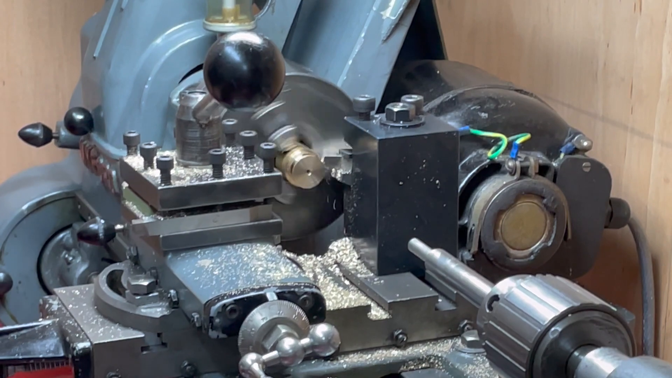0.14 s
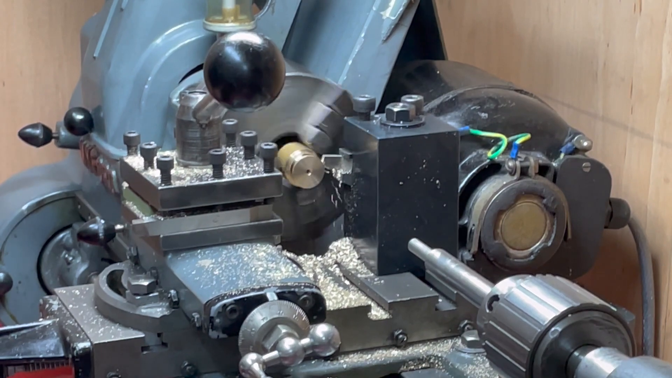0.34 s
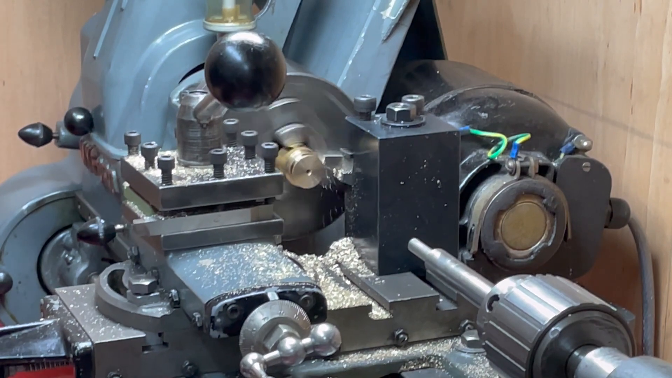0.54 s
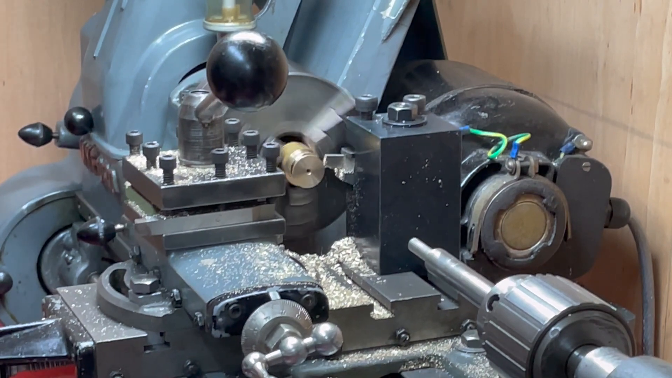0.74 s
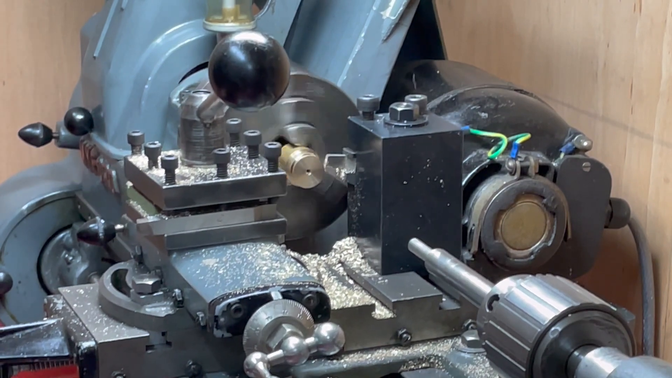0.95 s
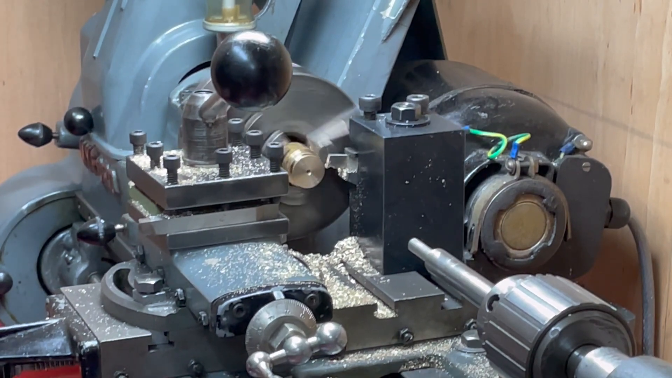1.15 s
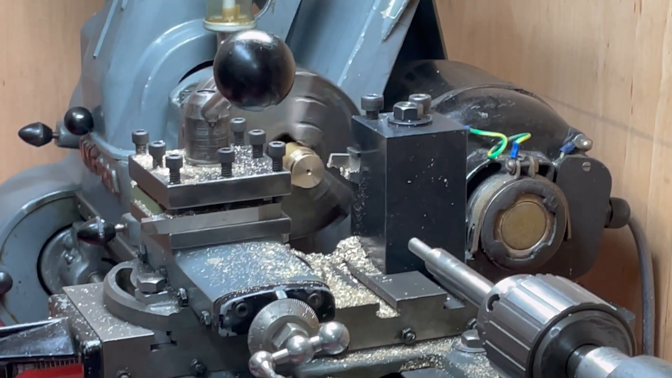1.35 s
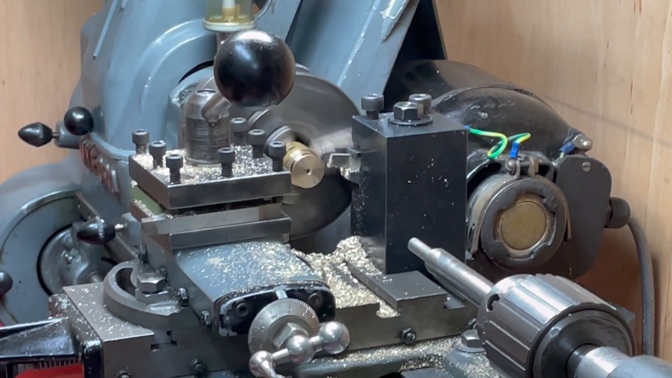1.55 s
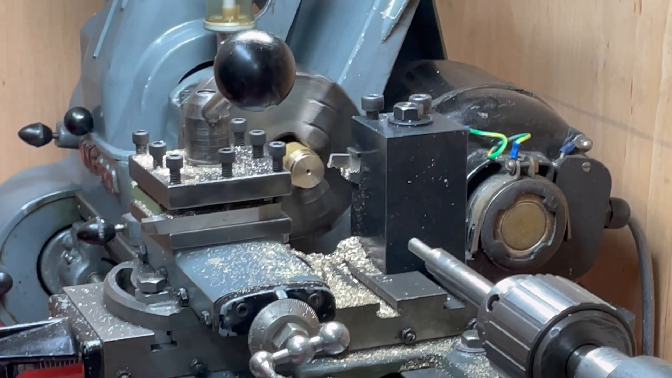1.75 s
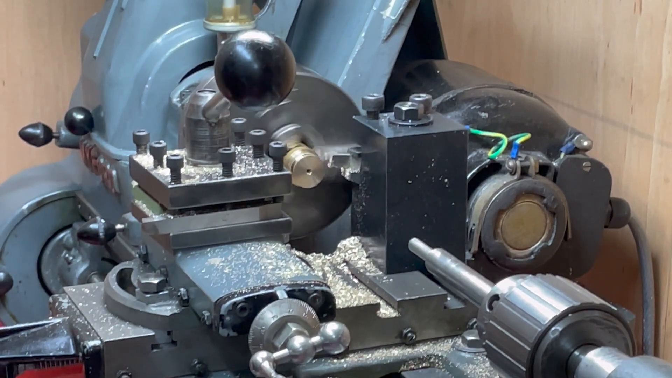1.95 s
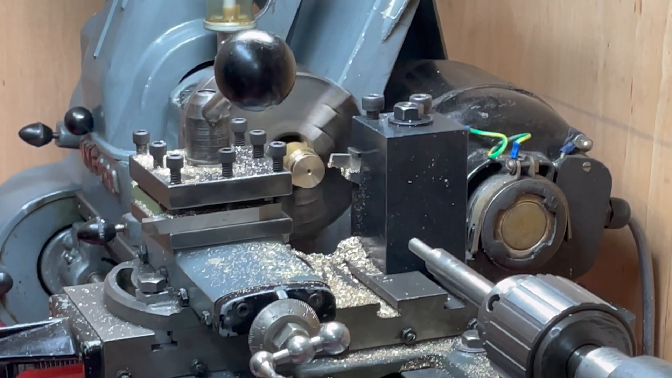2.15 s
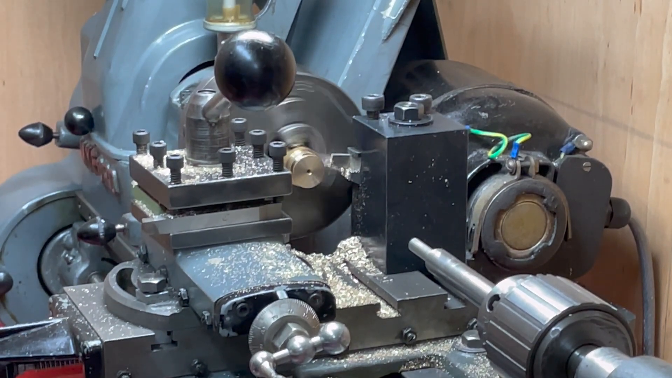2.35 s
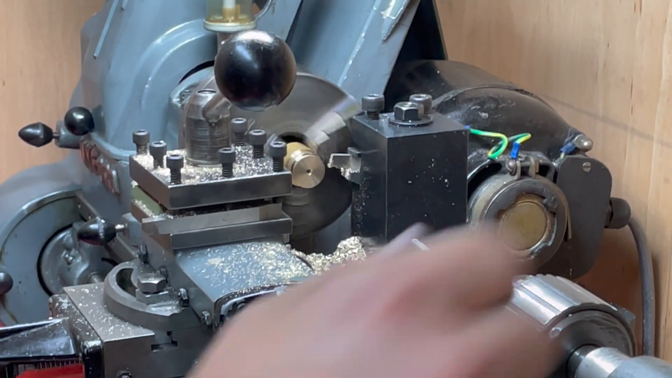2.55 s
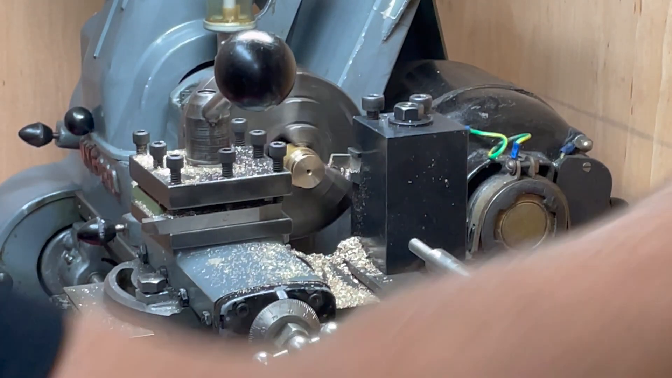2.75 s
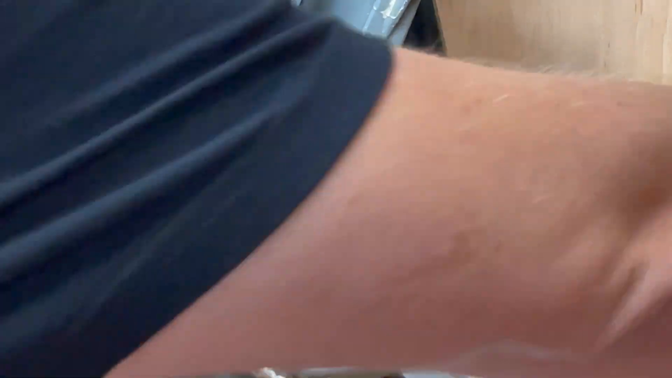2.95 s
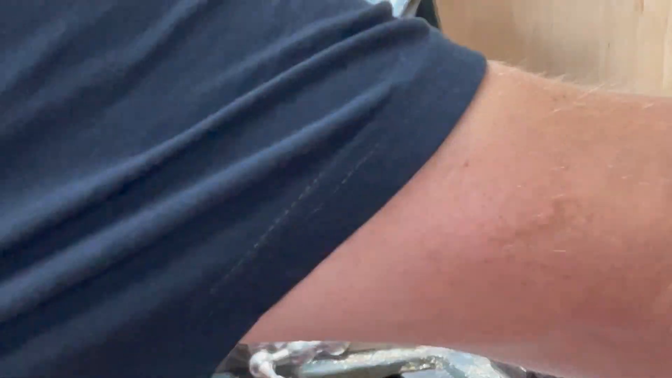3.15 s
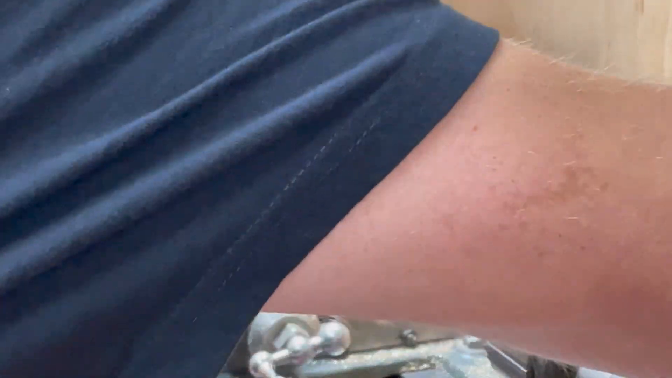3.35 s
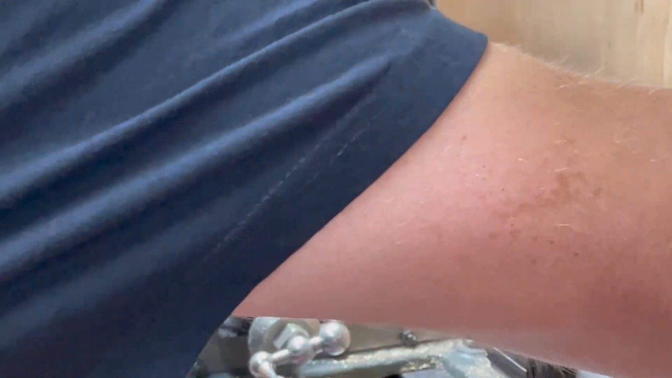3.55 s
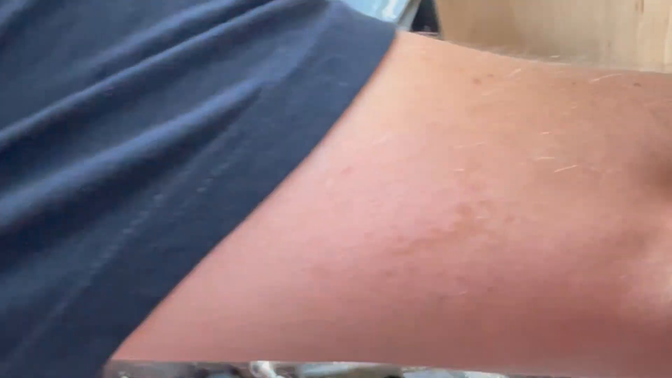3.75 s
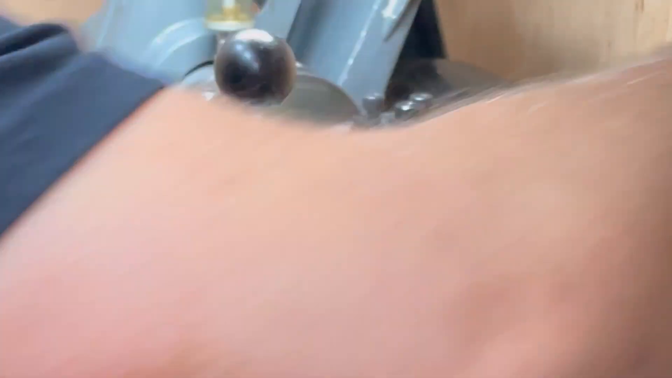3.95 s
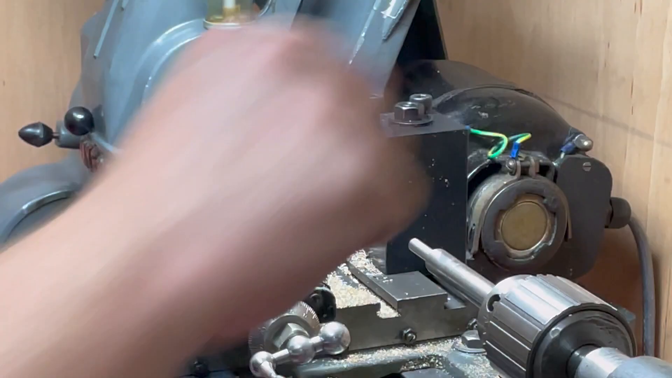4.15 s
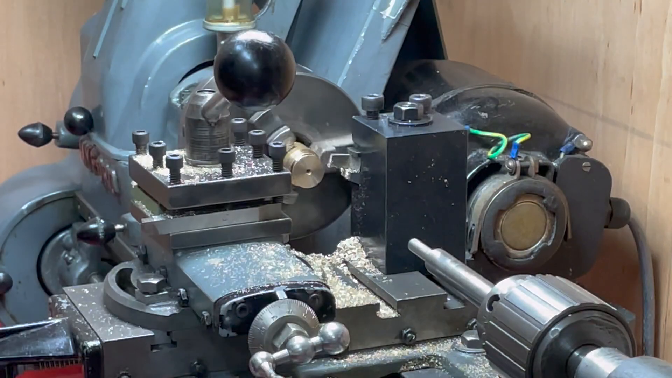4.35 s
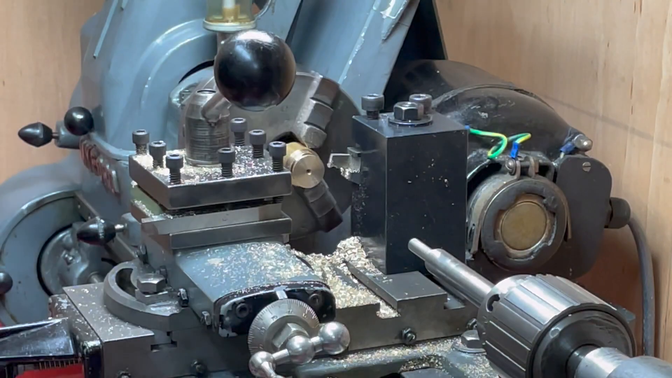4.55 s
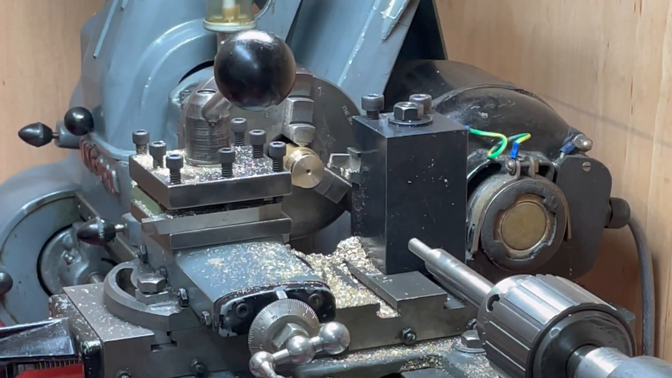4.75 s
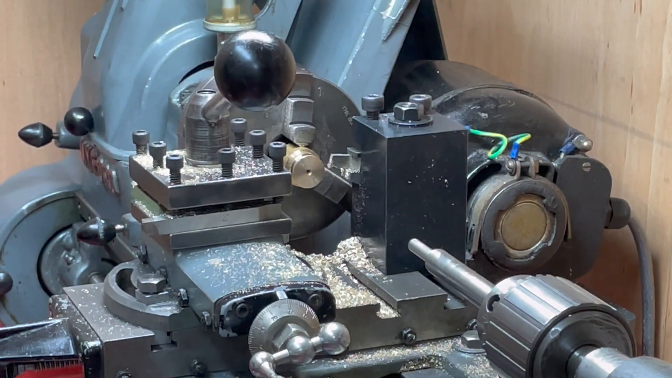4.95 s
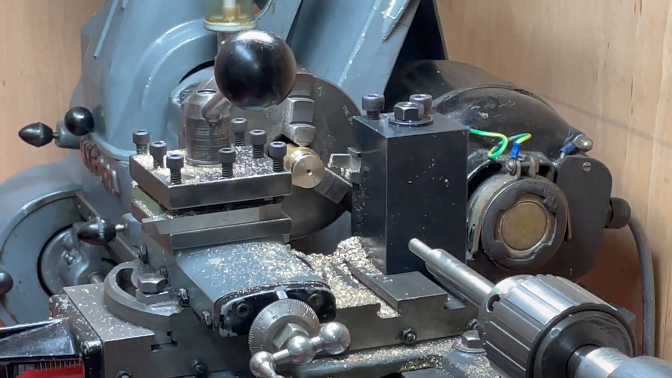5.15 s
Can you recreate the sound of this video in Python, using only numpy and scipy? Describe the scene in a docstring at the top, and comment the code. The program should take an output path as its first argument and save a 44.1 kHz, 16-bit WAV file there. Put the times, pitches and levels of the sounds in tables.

```python
"""A small metal lathe in a home workshop, close to a phone. From the start: mains hum, motor whir, a hissing,
squealing tool finishing its cut in brass, and a drive that ticks once a spindle turn, missing a few.
Bumps on the bench follow; an arm reaches over (cloth noise), the switch snaps off, the motor coasts down,
its starting switch clicks shut, fingertips tap near the phone, something set down stutters to rest.
Hum and squeal are sines; whir, hiss and cloth are shaped noise; blows are decaying modes plus a crack."""
import sys
import numpy as np
from scipy import signal
from scipy.fft import rfft, irfft
from scipy.io import wavfile
from scipy.ndimage import uniform_filter1d

SR = 44100
rng = np.random.default_rng(int(sys.argv[2]) if len(sys.argv) > 2 else 0)


def attenuation_scalar(level_db):
    """Turn a level in dB into a linear amplitude multiplier (20 dB per decade)."""
    decades = np.asarray(level_db, float) / 20
    return 10 ** decades


def unload_wav(signal):
    """Save mono or channel-first audio to the path in sys.argv[1] as 16-bit WAV at rate SR, clipped to [-1, 1]."""
    wavfile.write(
        sys.argv[1],
        SR,
        np.round(np.clip(np.atleast_2d(signal).T, -1, 1) * 32767).astype(np.int16),
    )


N = 228702
T = np.arange(N) / SR
OFF_S = 3.377
POWERED = np.clip((OFF_S + 0.044 - T) / 0.02, 0, 1)


def level(x, db):
    """Scale to an rms level."""
    return x * attenuation_scalar(db) / np.sqrt(np.mean(x ** 2))


def curve(rows, column=1, **edge):
    """One column of a table, sample by sample."""
    rows = np.array(rows, float)
    return np.interp(T, rows[:, 0], rows[:, column], **edge)


def along(points):
    """(f/Hz, level/dB) points read at every FFT bin, on a log frequency axis."""
    hz, db = np.transpose(points)
    return np.interp(np.log(np.fft.rfftfreq(N, 1 / SR) + 1), np.log(hz), db)


def noise(points):
    """Noise of rms 1 with the given spectrum."""
    return level(irfft(rfft(rng.standard_normal(N)) * attenuation_scalar(along(points)), N), 0)


def band(x, hz, width_hz):
    """One resonance."""
    return signal.lfilter(*signal.iirpeak(hz, hz / width_hz, SR), x)


def narrow(modes):
    """Noise ringing in sharp resonances, each at its own level."""
    return sum(level(band(rng.standard_normal(N), hz, width_hz), db) for hz, width_hz, db in modes)


def walk(rate_hz):
    """Slow random wander, spread near 1."""
    k = int(SR / rate_hz)
    steps = np.repeat(rng.standard_normal(N // k + 1), k)
    return 1.2 * uniform_filter1d(uniform_filter1d(steps, k), k)[:N]


def tones(lines):
    """Steady tones that waver a little in level, together."""
    waver_db = 1.5 * walk(25)
    return sum(np.sqrt(2) * attenuation_scalar(db + waver_db) * np.sin(2 * np.pi * hz * T) for hz, db in lines)


def smear(x, low_s, high_s):
    """Four all-pass echoes: same colour, scrambled phase."""
    for lag_s in rng.uniform(low_s, high_s, 4):
        k = int(lag_s * SR)
        x = signal.lfilter(np.r_[-.5, np.zeros(k - 1), 1], np.r_[1, np.zeros(k - 1), -.5], x)
    return x


def strike(out, start_s, db, modes, crack_db, crack_s, rattle_s, crack_hz=(1500, 9000),
           scatter_db=2.0, spread=.035, rough=1):
    """One blow: a short rattle of contacts drives detuned triples of modes, plus a burst of crack noise."""
    t = np.arange(SR // 4) / SR
    chance = rng.standard_normal((len(modes), 4))
    body = 0
    for (hz, gain_db, t60_s), c in zip(modes, chance):
        triple = np.sin(2 * np.pi * hz * np.outer(1 + spread * c[1:], t)).sum(axis=0)
        ring = triple * 1000 ** (-t / t60_s)
        push = (1 - rough + rough * rng.standard_normal(len(t))) * t * np.exp(-t / rattle_s)
        mode_db = gain_db + scatter_db * c[0] + 10 * np.log10(t60_s)
        body = body + level(signal.fftconvolve(ring, push)[:len(t)], mode_db)
    crack = signal.lfilter(*signal.butter(2, crack_hz, "band", fs=SR), rng.standard_normal(len(t)))
    crack = attenuation_scalar(crack_db) * crack * np.exp(-t / crack_s) * np.clip(t / rattle_s, 0, 1)
    blow = body / np.abs(body).max() + crack
    i = int(start_s * SR)
    out[i:i + len(t)] += attenuation_scalar(db) * blow[:N - i]


# magnetic hum at twice the mains, before beat and switch-off: t/s, level/dB
HUM_LEVEL = [(0, -20.5), (.36, -24.5), (.47, -19), (.56, -23), (.8, -24), (1.0, -20.5), (1.45, -22),
             (1.7, -20), (1.9, -21), (1.96, -26.5), (2.03, -23), (2.2, -20.5), (2.5, -25), (2.7, -20.5),
             (2.92, -23), (3.0, -29.5), (3.1, -22.5), (3.37, -21.5)]
# shaft sidebands and bench resonance around the hum: f/Hz, width/Hz, level/dB
THROB_MODES = [(55, 3, -37), (75, 2.5, -40), (126, 2.5, -43)]


def hum():
    """Sine that beats steadily; unpowered it drops, lingers in the frame, then dies away with its throb."""
    HUM_HZ, WAVER_RAD = 99.97, .25
    BEAT_HZ, BEAT_PEAK_S, BEAT_DB = 5.73, .47, 1
    DROP_DB, DROP_S, LINGER_S, FADE_DB_PER_S = -13, .03, .17, 110
    off_s = T - OFF_S
    hum_db = curve(HUM_LEVEL) + POWERED * BEAT_DB * np.cos(2 * np.pi * BEAT_HZ * (T - BEAT_PEAK_S))
    hum_db = hum_db + DROP_DB * np.clip(off_s / DROP_S, 0, 1)
    hum_db = hum_db - FADE_DB_PER_S * np.maximum(off_s - LINGER_S, 0)
    sine = np.sqrt(2) * attenuation_scalar(hum_db) * np.sin(2 * np.pi * HUM_HZ * T + WAVER_RAD * walk(12))
    throb = narrow(THROB_MODES) * np.exp(-np.maximum(off_s, 0) / 0.34)
    return sine + throb


# treble of the rasp: f/Hz, relative level/dB per Hz
RASP_SPECTRUM = [(1800, -1), (2700, -6), (3050, 5.5), (3250, -16.5), (3480, 4.5), (4100, -4), (4700, -2.5),
                 (5300, -4.5), (7000, -12), (10000, -25.5), (14000, -32)]


def rasp():
    """Treble noise pulsing once a shaft turn, each pulse of its own size."""
    SHAFT_HZ, SHAFT_FIRST_S = 24.82, .0215
    turns = (T - SHAFT_FIRST_S) * SHAFT_HZ
    phase = turns % 1
    turn = np.floor(turns).astype(int) + 1
    size = attenuation_scalar(1.5 * rng.standard_normal(turn.max() + 1))[turn]
    pulse = np.exp(-phase / .16) * np.clip(phase / .04, 0, 1)
    return level(size * pulse * noise(RASP_SPECTRUM), -6)


# whir gain while powered: t/s, gain/dB
RUN_GAIN = [(0.0, -40), (0.61, -38.5), (0.81, -41.5), (1.51, -40.5), (1.88, -40.5), (2.28, -42),
            (2.61, -40.5), (3.27, -40), (3.4, -36)]
# whir colour: f/Hz, relative level/dB per Hz
WHIR_SPECTRUM = [(25, -24), (50, -6), (140, 3.5), (200, -24.5), (260, -16.5), (380, -13), (700, -13.5),
                 (1200, -14.5), (1800, -20), (3500, -21), (5000, -26.5), (8000, -35), (11000, -42.5),
                 (16000, -69)]
# casting resonances, before the run gain: f/Hz, width/Hz, level/dB
CASTING_MODES = [(228, 86, -5.5), (582, 26, -7.5), (912, 12, -11.5), (1130, 22, -17), (3030, 57, -34)]
# narrow whines of the powered motor: f/Hz, width/Hz, level/dB
WHINE_MODES = [(583, 18, -60), (625.6, 6, -53.5), (729.8, 14, -45.5), (810.5, 16, -44.5)]
# rotor slot tones, before the waver: f/Hz, level/dB
SLOT_TONES = [(1491, -48), (4367, -59), (5460, -58)]


def motor():
    """Powered motor: whir noise, casting resonances, shaft rasp, whines and slot tones."""
    swell_db = 1.5 * walk(12)
    whir = level(noise(WHIR_SPECTRUM), 4.03) * attenuation_scalar(swell_db) + narrow(CASTING_MODES) + rasp()
    return POWERED * (narrow(WHINE_MODES) + tones(SLOT_TONES) + whir * attenuation_scalar(curve(RUN_GAIN)))


# background colour: f/Hz, relative level/dB per Hz
SHOP_SPECTRUM = [(15, -53.5), (25, -24), (53, 8.5), (161, -11.5), (204, -4), (454, -17.5), (944, -48.0),
                 (1280, -51.5), (1480, -41.5), (7000, -32.0), (9100, -27), (15400, -120), (16000, -35.5)]
# background tones, before the waver: f/Hz, level/dB
SHOP_LINES = [(1306, -64), (1230, -81.5)]


def shop():
    """Constant workshop background: shaped noise and faint tones."""
    return level(noise(SHOP_SPECTRUM), -52.5) + tones(SHOP_LINES)


# chip hiss: f/Hz, relative level/dB per Hz
CHIP_SPECTRUM = [(1500, 20.5), (3000, -27), (6000, 21.5), (9000, 3), (13500, 8.5), (14500, -10),
                 (17000, -6.5)]
# squeal bursts: from t/s, to t/s, gain/dB within the cut
SQUEAL_BURSTS = [(0.175, 0.244, 3.5), (0.464, 0.573, 7.5), (0.64, 0.647, 8.5)]


def cutting():
    """Tool in brass: hiss plus rough squeal and octave, louder just before the tool comes clear."""
    GAIN_DB, END_S, LAST_DB, LAST_S, FADE_DB_PER_S = -48.5, .705, 5, 0.16, 700
    SQUEAL_HZ, REST_DB, EDGE_S = 5920, -7, .04
    waver_hz = 150 * walk(500)
    spin = 2 * np.pi * np.cumsum(SQUEAL_HZ + 50 * walk(9) + waver_hz) / SR
    cut_db = GAIN_DB + np.interp(T, [END_S - LAST_S, END_S], [0, LAST_DB])
    cut_db = cut_db - FADE_DB_PER_S * np.maximum(T - END_S, 0)
    bursts = sum(np.interp(T, [a - EDGE_S, a, b, b + EDGE_S], [0, attenuation_scalar(db), attenuation_scalar(db), 0])
                 for a, b, db in SQUEAL_BURSTS)
    flutter = attenuation_scalar(4 * walk(120))
    squeal = flutter * (attenuation_scalar(REST_DB) + bursts) * (np.sin(spin) + attenuation_scalar(-14.0) * np.sin(2 * spin))
    hiss = level(noise(CHIP_SPECTRUM), 6.5) * attenuation_scalar(2.24 * walk(53))
    return attenuation_scalar(cut_db) * (hiss + squeal)


TICK_PEAKS = [-15, -15.5, -24, -15.5, -14.5, -28, -15, -17, None, -14.5, -25.5, -23, -14, -25, -15.5, -16,
              None, -22, -25, -25, -18.5, -27]
# late tick as the spindle slows: t/s, ring peak/dB
LATE_TICK = (3.52, -33.5)
# metallic drive modes, also rung by the taps: f/Hz, relative level/dB, t60/s
DRIVE_MODES = [(820, -4, .025), (1000, -5, .025), (1138, 0, .06), (1450, -5, .025), (1700, -7, .025),
               (1950, -7, .025), (2283, -6, .04), (2650, -8, .025), (3000, -12, .02), (3440, -10, .045),
               (4200, -16, .02)]


def drive():
    """Dry, grainy metallic knocks; weak ones ring lower and crack less. A thin flick leads each powered turn."""
    TURN_S, FIRST_S = .15657, .0643
    FIRM_DB, CRACK_DB, DULL_PER_DB = -15, -12, .6
    LOW_RING_DB, LOW_RING_PER_DB = -1, .5
    FLICK_LEAD_S, FLICK_DB, FLICK_S = .017, -43.5, .008
    out = np.zeros(N)
    ticks = [(FIRST_S + k * TURN_S, db) for k, db in enumerate(TICK_PEAKS)]
    for s, db in ticks + [LATE_TICK]:
        if db is None:
            continue
        weak_db = FIRM_DB - db
        low_db = LOW_RING_DB + LOW_RING_PER_DB * weak_db
        modes = [(hz, g + low_db * (hz < 1300), t60_s) for hz, g, t60_s in DRIVE_MODES]
        strike(out, s, db, modes, CRACK_DB - DULL_PER_DB * weak_db, .012, .0018,
               crack_hz=(700, 4500), spread=0.028)
    turn = (T - FIRST_S + FLICK_LEAD_S) / TURN_S
    size = attenuation_scalar(FLICK_DB + 2.5 * rng.standard_normal(64))[np.floor(turn).astype(int) + 1]
    flick = size * np.exp(-(turn % 1) * TURN_S / FLICK_S) * (T < OFF_S)
    return out + flick * noise([(4000, -32), (8000, 11.5), (11000, -5), (13500, -15.5), (15000, -27.5)])


# wooden bench modes: f/Hz, relative level/dB, t60/s
BENCH_MODES = [(74, -2.5, 0.3), (146.6, -7, 0.12), (250.8, -2, 0.18), (298, -2, .1), (340, -5, 0.056),
               (403, -7, 0.08)]


def bench_knocks(knocks):
    """Dull knocks (t/s, peak/dB, gain above 200 Hz/dB, contact/s) spreading through the boards."""
    out = np.zeros(N)
    for s, db, high_db, contact_s in knocks:
        modes = [(hz, g + high_db * (hz > 200), t60_s) for hz, g, t60_s in BENCH_MODES]
        strike(out, s, db, modes, -28, .02, contact_s, crack_hz=(300, 3000), spread=.02, rough=0)
    return smear(out, .001, .004)


# single bumps, before spreading: t/s, ring peak/dB, gain above 200 Hz/dB
BUMP_LIST = [(0.693, -23, 14), (1.54, -18, 5), (1.775, -16.5, 20), (1.8, -12.5, 15), (3.38, -27, 13),
             (4.037, -33, 16), (5.06, -37, -5.5)]


def bumps():
    """Single bumps on the bench, all of one contact time."""
    return bench_knocks([(*bump, .00054) for bump in BUMP_LIST])


# sleeve and arm moving: start t/s, fullest t/s, end t/s, gain/dB, crisp gain/dB
SLEEVE_MOVES = [(2.43, 2.48, 2.88, -38.5, 2), (3.5, 3.95, 3.98, -48, 3), (4.08, 4.39, 4.42, -50, 2),
                (4.83, 4.84, 4.95, -48, 2), (5.14, 5.18, 5.3, -43, 8)]
# soft cloth: f/Hz, relative level/dB per Hz
CLOTH_SPECTRUM = [(300, 9), (1000, 8.5), (2500, 8), (4500, 5), (7000, -1), (10000, -27.5), (13000, -53.5),
                  (16000, 5)]


def sleeve():
    """Soft cloth hiss with a fine grain; crisp folds add treble that dulls as each move goes on."""
    START_DB, FADE_DB_PER_S, CRISP_FADE_DB_PER_S = -9, 116, 16
    soft = level(noise(CLOTH_SPECTRUM), 3.1)
    crisp = level(noise([(5000, -15), (8000, -3), (12000, -8), (15000, -16.5)]), -10.5)
    power, crisp_power = 0, 0
    for start, full, end, db, crisp_db in SLEEVE_MOVES:
        swell_db = db + np.interp(T, [start, full], [START_DB, 0]) - FADE_DB_PER_S * np.maximum(T - end, 0)
        move = attenuation_scalar(swell_db) * np.clip(1 + (T - start) / 0.0075, 0, 1)
        fold = move * attenuation_scalar(crisp_db - CRISP_FADE_DB_PER_S * np.maximum(T - full, 0))
        power = power + move ** 2
        crisp_power = crisp_power + fold ** 2
    moves = np.sqrt(power) * soft + np.sqrt(crisp_power) * crisp
    return moves * attenuation_scalar(1.2 * walk(120) + 1.3 * walk(25))


# off switch: t/s, ring peak/dB
SNAP_CLICKS = [(3.369, -30), (3.377, -2)]
# off switch modes: f/Hz, relative level/dB, t60/s
SNAP_MODES = [(1663, -7, .025), (2500, -15, .02), (3100, 3, .014), (3560, -9, .03), (4100, -13, .02),
              (4800, 9, .009), (5600, -1, .01), (6400, -3, .009), (10200, -2, .012)]


def off_switch():
    """Switch snap: a faint contact, then the hard one; bright modes and a short crack."""
    out = np.zeros(N)
    for s, db in SNAP_CLICKS:
        strike(out, s, db, SNAP_MODES, -8, .007, .0009, crack_hz=(2500, 13000), scatter_db=0, spread=.03)
    return out


# unpowered coast: t/s, bearing ring gain/dB, belt rumble gain/dB
COAST_GAINS = [(3.42, -72, -44.5), (3.5, -60, -54), (3.55, -60.5, -52.5), (3.8, -55.5, -49.5),
               (4.378, -55, -49.5), (4.624, -65.5, -56), (4.82, -79, -63)]


def coasting():
    """Resonant noise: bearing ring swells to about 4.4 s, belt rumble dips and returns, then both fade."""
    ring_db = 2.0 * walk(90) + 1.5 * walk(12) + curve(COAST_GAINS, left=-99, right=-99)
    rumble_db = 1.5 * walk(40) + curve(COAST_GAINS, column=2, left=-99, right=-99)
    ring = narrow([(2180, 140, 3.5), (1860, 200, -3.5), (3100, 500, -9), (4850, 460, -4.5), (6740, 300, -8.5)])
    rumble = narrow([(353, 55, -1.0), (370, 630, -2.5)])
    return ring * attenuation_scalar(ring_db) + rumble * attenuation_scalar(rumble_db)


# starting switch: t/s, ring peak/dB
SHUT_CLICKS = [(4.021, -29), (4.0300, -12.5)]
# starting switch modes: f/Hz, relative level/dB, t60/s
SHUT_MODES = [(520, -14, .04), (2230, -11, .03), (3300, -12, .02), (5000, -10, .015), (6780, -3, .015),
              (8500, -2, .01), (9800, -3, .01), (10800, 0, .012), (11900, -4, .01)]


def starting_switch():
    """Switch inside the motor clicks shut: high modes and a strong crack."""
    out = np.zeros(N)
    for s, db in SHUT_CLICKS:
        strike(out, s, db, SHUT_MODES, -2, .006, .0012, crack_hz=(5500, 13500), scatter_db=0)
    return out


# fingertip taps near the phone: t/s, ring peak/dB
TAP_LIST = [(4.223, -53), (4.384, -53), (4.838, -45.5), (4.946, -40), (5.144, -42.5)]


def taps():
    """Small taps, mostly crack, over the drive modes."""
    out = np.zeros(N)
    for s, db in TAP_LIST:
        strike(out, s, db, DRIVE_MODES, 6, .004, .0006, crack_hz=(1500, 12000))
    return out


def set_down():
    """Something set down on the bench stutters to rest, contacts longer and duller each time."""
    START_S, GAP_S, COUNT = 4.834, .0161, 8
    PEAK_DB, ENDS_DB, SCATTER_DB = -19.5, -4, 1.5
    u = np.linspace(0, 1, COUNT)
    time_chance, level_chance = rng.standard_normal((2, COUNT))
    times_s = START_S + GAP_S * (np.arange(COUNT) + .08 * time_chance)
    peaks_db = PEAK_DB + ENDS_DB * (2 * u - 1) ** 2 + SCATTER_DB * level_chance
    return bench_knocks(zip(times_s, peaks_db, np.linspace(10, -10, COUNT), np.linspace(.0006, .0016, COUNT)))


def room(hits):
    """Brief reverberation between close walls: lowpassed, decaying noise."""
    T60_S, ROOM_DB = 0.23, -6
    t = np.arange(SR // 2) / SR
    tail = rng.standard_normal(len(t)) * 1000 ** (-t / T60_S) * np.clip(t / 0.004, 0, 1)
    tail = signal.lfilter(*signal.butter(1, 7000, fs=SR), tail)
    return signal.fftconvolve(hits, attenuation_scalar(ROOM_DB) * tail / np.sqrt(np.sum(tail ** 2)))[:N]


def scene():
    """All sources, and the same sound by a second path round the phone."""
    hits = drive() + off_switch() + starting_switch() + taps()
    steady = hum() + motor() + shop() + cutting() + coasting()
    here = steady + bumps() + sleeve() + set_down() + hits + room(hits)
    # second path smeared in time: bass by the walls, treble by the case
    low, high = (signal.lfilter(*signal.butter(2, 4000, kind, fs=SR), here) for kind in ("low", "high"))
    beside = smear(low, .004, .012) + smear(high, .0002, .001)
    return np.array([here, beside])


def top_cut(x):
    """Nothing passes above the cut-off."""
    return signal.sosfilt(signal.butter(12, 15950, fs=SR, output="sos"), x)


# disagreement of the two microphone ports, before the lean: f/Hz, difference over sum/dB
PORT_SPLIT = [(60, -27), (100, -44.5), (140, -6.5), (200, -16), (700, -6), (1300, -5.5), (2200, -12.5),
              (2700, -35), (6000, -29.5), (7000, -5), (7600, 1.5), (8000, 31), (8800, 13.5), (9400, 0.5),
              (10600, -15), (12500, -12), (13300, -3.5), (14200, 18)]


def record(dry):
    """Two ports share the sound: their sum and difference trade places band by band."""
    angle = np.arctan(attenuation_scalar(along(PORT_SPLIT)))
    both = irfft(rfft(dry[0]) * np.cos(angle), N)
    # level lean between the ports
    lean_db = along([(55, -.3), (100, 1.3), (250, -.8), (500, 1.2), (1500, 1.2), (3000, 0)]) / 2
    lean = rfft(both) * np.tanh(lean_db * np.log(10) / 20)
    apart = irfft(rfft(dry[1]) * np.sin(angle) + lean, N)
    pair = np.array([both + apart, both - apart])
    # peaks rounded off just under full scale
    pair = pair / (1 + np.abs(pair / .97) ** 6) ** (1 / 6)
    return top_cut(pair)


dry = scene()
out = record(dry)
unload_wav(out)
```